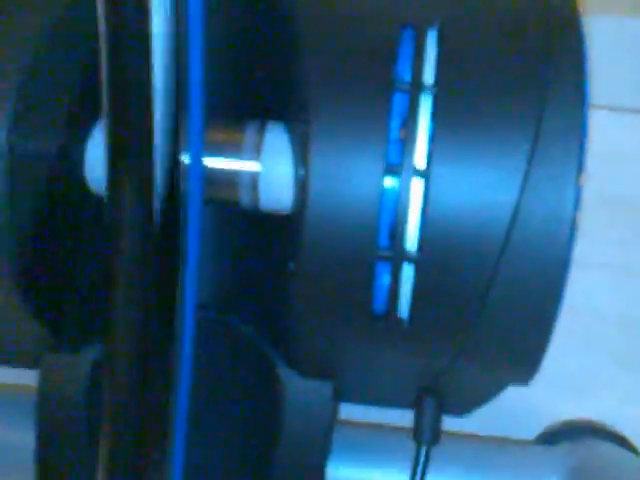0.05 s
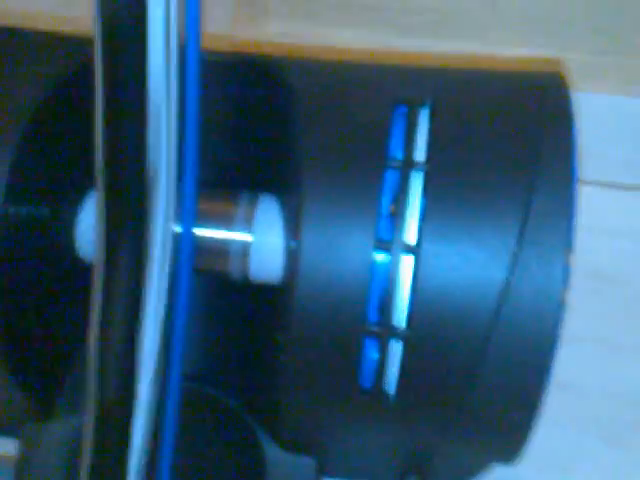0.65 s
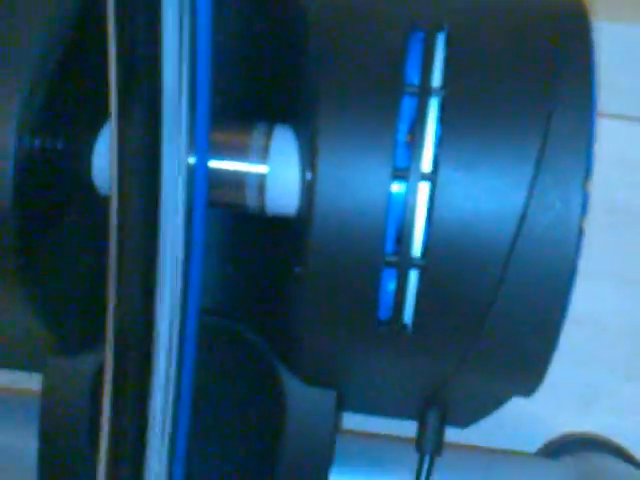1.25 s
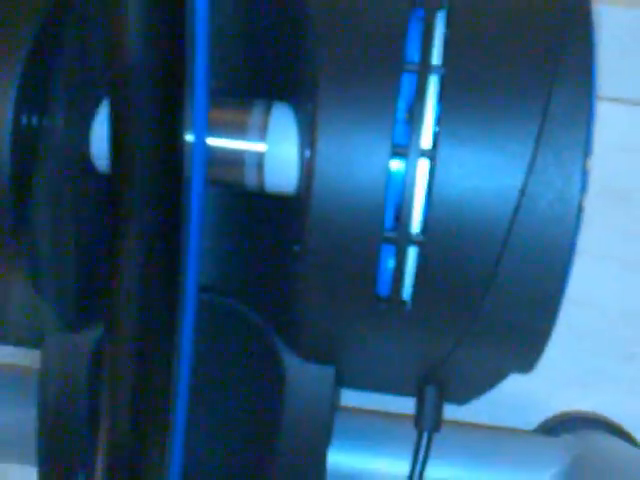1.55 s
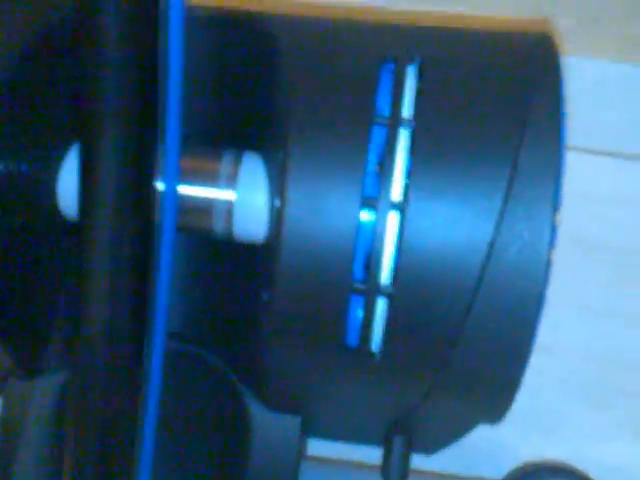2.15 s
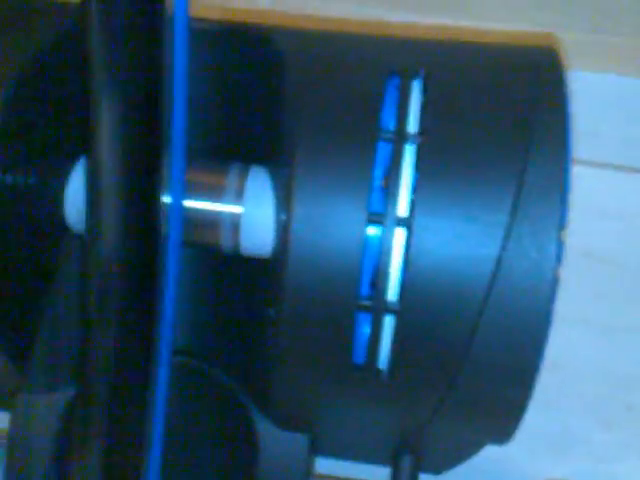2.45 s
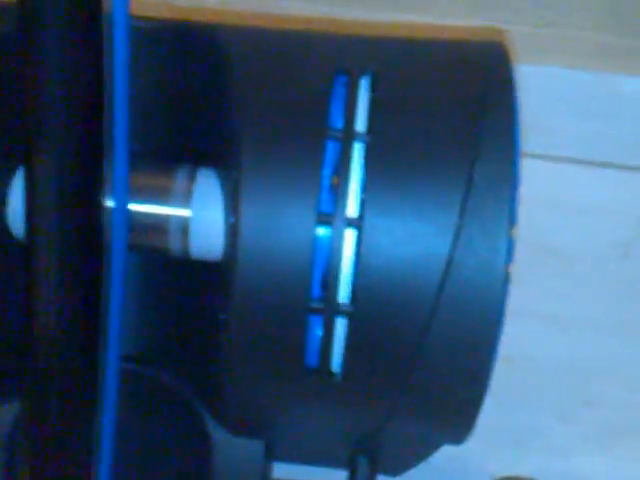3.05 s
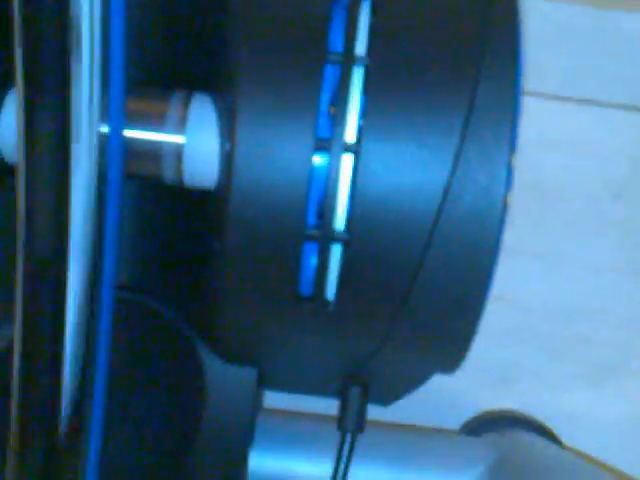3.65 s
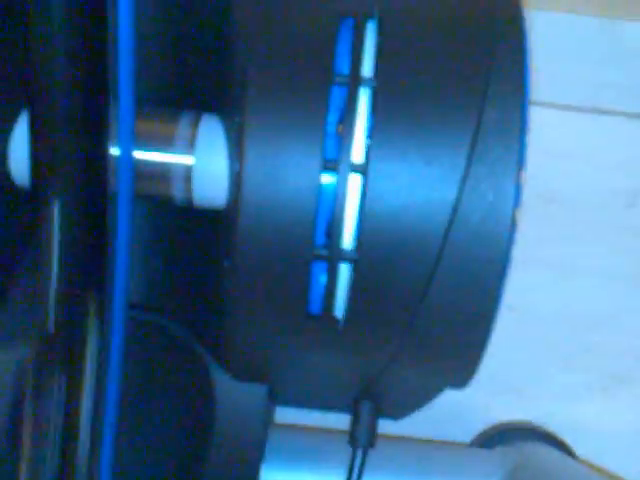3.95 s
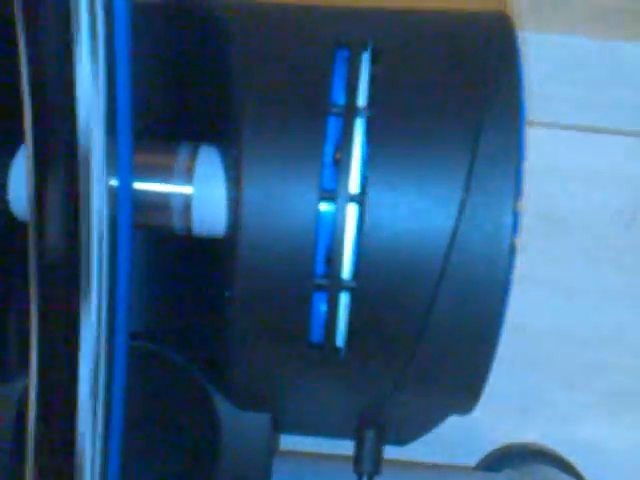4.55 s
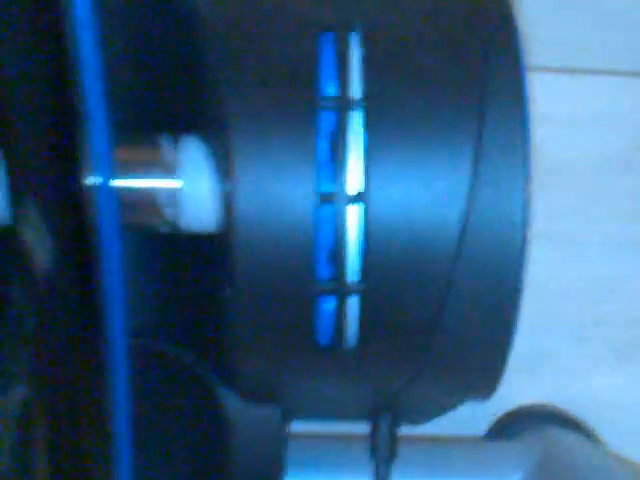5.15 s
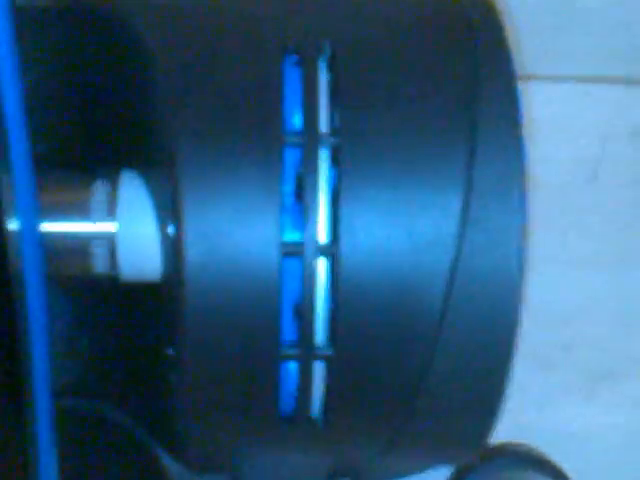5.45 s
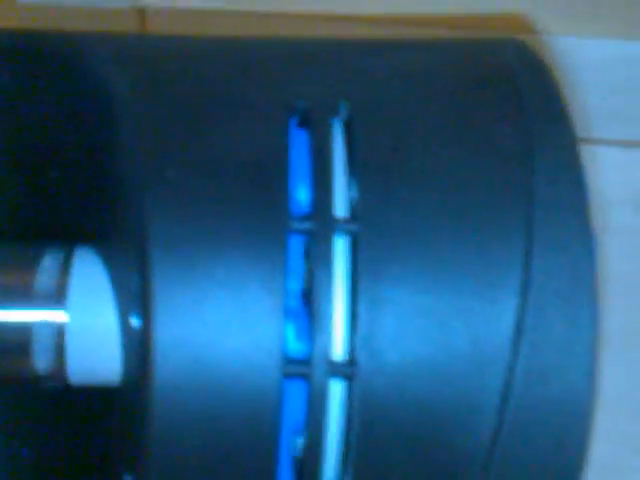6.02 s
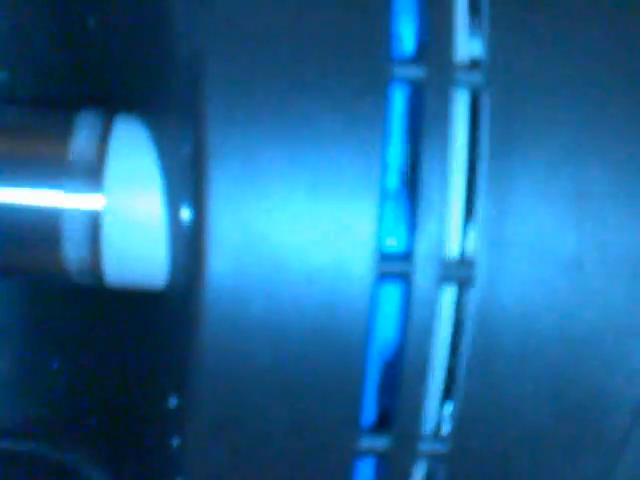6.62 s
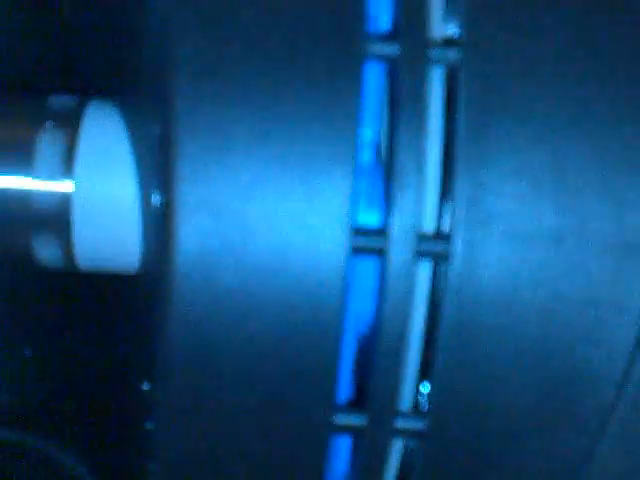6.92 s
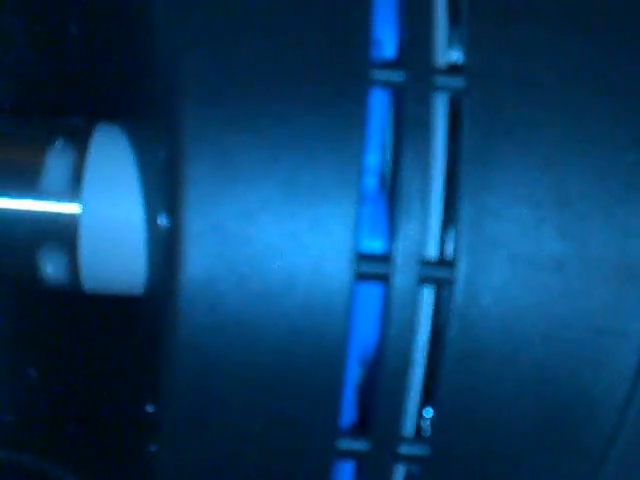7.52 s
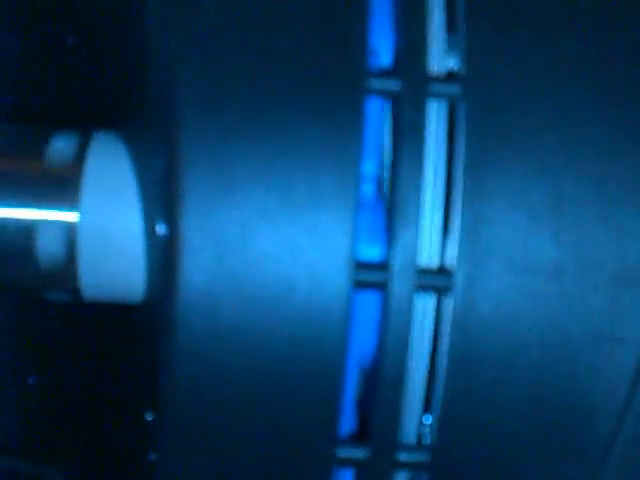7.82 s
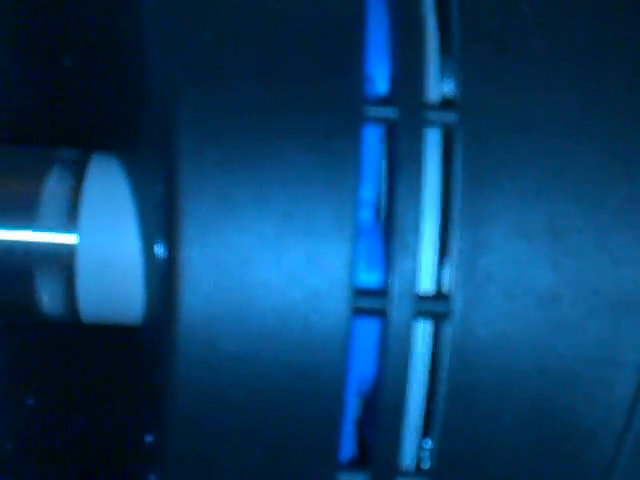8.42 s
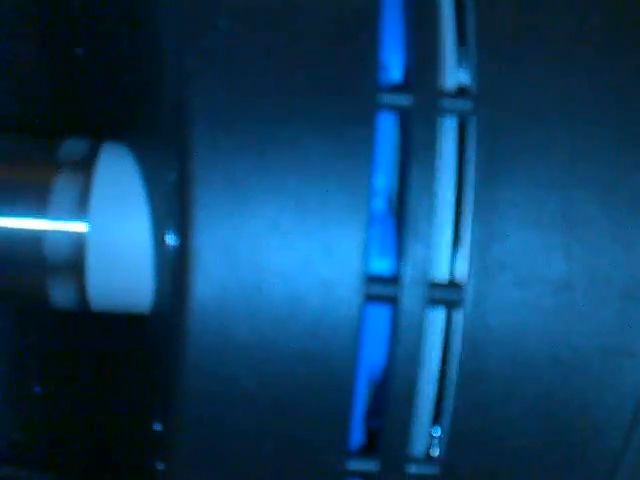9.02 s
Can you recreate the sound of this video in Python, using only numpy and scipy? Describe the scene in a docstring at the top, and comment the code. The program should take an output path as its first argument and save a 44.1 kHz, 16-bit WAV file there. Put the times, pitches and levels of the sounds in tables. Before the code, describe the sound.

A bicycle wheel spins on an indoor trainer, the tyre whirring on the roller in surges while the brake rubs once a turn, making rapid, ringing metallic ticks. A thump shakes the frame early on. About halfway the wheel slows and the whirr fades amid a brief hiss and a few handling knocks. Soft, slower scraping ticks and tiny squeaks carry on to the end, heard close up in a small room.

```python
"""A bicycle wheel spins on a turbo trainer in a small room, heard close to the brake unit.
At first the tyre whirrs on the roller, surging with the pedals. Once a turn a tight spot in the brake
rubs: it squeals, chatters near 1 kHz, scrapes and sets the metal ringing. Two bumps shake the frame.
By 5 s the wheel has slowed; the tyre fades amid a brush of hiss, handling knocks and four level dips.
To the end it creeps on, one soft chafe a turn. Short squeaks sound nearby throughout."""
import sys
import numpy as np
from scipy import signal
from scipy.fft import rfft, irfft
from scipy.io import wavfile
from scipy.ndimage import uniform_filter1d

SR = 44100
rng = np.random.default_rng(int(sys.argv[2]) if len(sys.argv) > 2 else 0)


def to_wav(s):
    """Save 16-bit WAV."""
    ch = np.atleast_2d(s).T  # columns
    pcm = np.round(np.clip(ch, -1, 1) * 32767)  # PCM
    wavfile.write(sys.argv[1], SR, pcm.astype(np.int16))


N = 409248
TIME_S = np.arange(N) / SR

# Wheel speed. Each row: time in seconds, turns per second.
SPEED_HZ = [(0.0, 18.12), (0.5, 17.81), (0.78, 15.43), (1.0, 11.82), (1.6, 17.5), (1.78, 16.73),
            (2.03, 17.3), (2.19, 18.45), (2.54, 14.01), (2.61, 11.67), (2.83, 11.93), (3.02, 13.52),
            (3.33, 14.33), (3.52, 13.13), (3.62, 11.93), (4.09, 11.94), (4.38, 10.87), (4.46, 9.3),
            (4.74, 8.13), (4.92, 5.15)]
# Grip of the tight spot; pedal effort. Each row: time in seconds, relative level in dB.
GRIP_DB = [(0.03, 2.5), (0.42, 1.5), (0.53, -0.8), (0.99, 0.4), (1.49, -1), (1.96, 1.7), (2.02, 3),
           (2.49, -2), (2.72, 4), (2.97, -3), (3.12, -1.0), (3.55, -3), (3.72, 2.6), (4.31, 2),
           (4.51, -2.5), (4.62, 6.5), (4.74, -2.5), (4.88, 7)]
PEDAL_DB = [(0.0, 13), (0.53, 8.0), (0.84, 2), (1.07, 15), (1.27, 19), (1.52, 14.5), (1.78, 11.5),
            (2.08, 11), (2.53, 0.5), (2.72, 15.5), (3.21, 12.5), (3.53, 6.5), (4.01, 13), (4.84, -2)]
# Start and end of the tyre's fade, in seconds.
TYRE_FADE_S = [4.7, 6.5]
# Room decay. Each row: frequency in Hz, t60 in seconds.
ROOM_T60_S = [(150, 0.3), (1000, 0.12), (4000, 0.17), (14000, 0.19)]
# Room hum. Each row: frequency in Hz, level in dB.
HUM_TONES = [(48.5, -83), (846.6, -91)]
# Handling rumble. Each row: centre in seconds, level in dB, half-width in seconds.
HANDLING_SWELLS = [(5.313, -54, 0.09), (5.76, -62, 0.092), (6.34, -61.5, .11), (6.8, -78, 0.1)]
# Frame bumps. Each row: start in seconds, level in dB, pitch in Hz, t60 in seconds, relative rattle in dB.
FRAME_BUMPS = [(0.269, -34, 211, 0.083, 8.5), (1.528, -16.5, 118, 0.026, -3.5), (5.07, -34.5, 91, 0.1, -14),
               (5.652, -43.5, 60, 0.087, -4.5)]
# One short brush of high hiss, then handling knocks. Each row: start in seconds, level in dB,
# t60 in seconds, low and top edges in Hz, relative crack and frame shake in dB.
BRUSH_AND_KNOCKS = [(5.068, -54, 0.35, 5450, 15000, -17, -25), (5.229, -48.5, 0.69, 480, 8400, 1, -11),
                    (5.326, -40, 0.53, 524, 1740, -16, -30), (5.652, -57.5, 0.6, 404, 1290, 7.5, -8),
                    (6.409, -53.5, 0.45, 470, 1300, -35, -7), (6.583, -40, 0.56, 610, 1000, -27, -12)]
# Squeaks. Each row: centre in seconds, pitch in Hz, level in dB, half-width in seconds.
SQUEAK_TONES = [(0.919, 1974, -31.5, 0.01), (4.249, 2304, -45.5, 0.015), (5.272, 8100, -39, 0.0037),
                (5.273, 5900, -45, 0.0055), (5.44, 1970, -40.5, 0.011), (6.031, 4420, -58.5, 0.012),
                (6.959, 2080, -59, 0.0095), (7.345, 1827, -64, 0.015), (8.052, 4510, -54, 0.01),
                (8.221, 2050, -62, 0.007), (8.624, 2040, -64, .007), (8.682, 3620, -70, .02)]
# Creeping rubs. Each row: time in seconds, chatter and scrape base levels in dB, high ring lift in dB.
CREEP_CHAFES = [(5.028, -41.5, -45, -7), (5.385, -38, -41.5, -5), (5.603, -53, -58.5, -11),
                (5.875, -50, -52.5, -1), (6.1269, -52, -53, -2), (6.365, -52, -52.5, 3),
                (6.617, -48, -44, -1), (6.9007, -49.5, -47, -3), (7.1786, -53.5, -48.5, -1),
                (7.4554, -57.5, -50.5, 0.5), (7.7888, -48, -51.5, 1.5), (8.196, -46, -48.5, 1),
                (8.531, -51, -49.5, 0.5), (8.795, -52, -49, 0), (9.0712, -52, -47, -1)]
# Level dips. Each row: start and end in seconds.
DIPS_S = [(5.163, 5.228), (5.305, 5.322), (5.621, 5.652), (6.463, 6.582)]

# Noise spectra. Each row: frequency in Hz, relative density in dB.
AIR_SPECTRUM = [(25, -1.5), (150, -9.5), (350, -16.5), (900, -9.5), (2000, -16.5), (4500, -15), (8000, -21),
                (16000, -16.5)]
FRAME_SPECTRUM = [(15, -17.5), (30, -12.5), (48, 7), (90, -5), (135, -4), (200, -7.5), (330, -15.5),
                  (700, -31.5), (3000, -60.5)]
WHIRR_SPECTRUM = [(150, -16), (350, -19), (480, -8), (700, -7.5), (1000, 7), (1400, -2), (2200, -1),
                  (2800, -5.5), (4300, -21), (6000, -32), (16000, -55)]
RASP_SPECTRUM = [(1200, -28), (2300, -2.5), (2900, -1), (3500, -3), (4000, -5.5), (4700, -16.5),
                 (7000, -31), (16000, -48)]
HISS_SPECTRUM = [(2000, -24), (4500, -6.5), (6500, -0.5), (9000, -3), (11500, -4), (13000, -6),
                 (16000, -12.5)]
FAST_SCRAPE_SPECTRUM = [(200, -21), (420, -10.5), (600, 2), (800, -3.5), (1500, 5.5), (2200, 1),
                        (3200, 4.5), (4000, -7.5), (4700, -11.5), (6500, -8.5), (7150, -15.5), (8300, -15),
                        (12000, -25), (16000, -30.5)]
SLOW_SCRAPE_SPECTRUM = [(200, -30.5), (550, -18), (1000, 3.5), (1500, -8), (1900, -14.5), (2350, -32.5),
                        (3000, -0.5), (4000, -2), (4700, -11), (6600, -13), (7150, -16), (8500, -19),
                        (12000, -21.5), (16000, -35.5)]
# Resonances. Each row: centre in Hz, width in Hz, lift in dB.
CRACK_PEAKS = [(2900, 76, -29), (3470, 150, -17), (3880, 180, 3), (5870, 310, 8)]
HOUSING_PEAKS = [(450, 30, 4), (572, 31, -8), (1379, 50, 0.5), (1572, 24, -4.5), (1852, 130, -9.5),
                 (2230, 17, 1.5), (2820, 57, -8), (3025, 21, -5.5), (3350, 42, -4.5), (3785, 82, -2.5),
                 (5330, 120, 3.5), (5620, 58, -0.5), (6120, 57, 2), (6735, 220, 0), (8460, 380, 1.5),
                 (9090, 340, 1.5)]
ROLLER_PEAKS = [(2100, 76, -1.5), (2690, 190, -8), (3370, 100, -0.5), (3740, 99, -5), (6180, 140, 1),
                (6550, 110, -0.5)]
RUB_PEAKS = [(3986, 160, 5), (7886, 100, 11), (7770, 300, 5), (10846, 430, 19.5), (14180, 170, 21.5)]
SLOW_RUB_PEAKS = [(2985, 46, 0), (3300, 200, -10.5), (4176, 150, 2), (5374, 90, -2), (6880, 90, 3),
                  (7620, 110, 8), (9150, 170, 6)]  # only a slow chafe has time to build these up
# Brake modes. Each row: frequency in Hz, gain in dB when fast and when slow, t60 in seconds.
LOW_BRAKE_MODES = [(901.8, 3.5, 9.5, 0.17), (560.5, -0.5, -30.5, 0.045), (755, -24, -12, 0.43),
                   (944, 5.5, -15.5, 0.058), (1225, -14, -3, 0.14), (1559, -10.5, -7.5, 0.13),
                   (2101, 7, 1, 0.039), (3100, -9, -3.5, 0.027)]
HIGH_BRAKE_MODES = [(3300, -18.5, -7, 0.037), (4170, -14, -13.5, .04), (4270, -30, 1, 0.055),
                    (4920, -20.5, -25, 0.21), (4980, -38, -14.5, 0.14), (7600, -16, -11.5, 0.14),
                    (14180, -19.5, -21, .06)]
# Stick-slip harmonics. Each row: multiple, gain in dB when fast and when slow.
CHATTER_HARMONICS = [(1, -2, 5.5), (2, -9, -48.5), (3, -20, -20.5), (4, -24.5, -29.5)]


def from_db(db):
    return 10 ** (np.asarray(db) / 20)


def unit_rms(x):
    return x / np.sqrt(np.mean(x ** 2) + 1e-20)


def bell(t, width):
    return np.exp(-0.5 * (t / width) ** 2)


def at_time(curve, time_s=TIME_S):
    return np.interp(time_s, *np.transpose(curve))


def at_hz(curve, hz):
    knots_hz, values = np.transpose(curve)
    return np.interp(np.log(hz + 1e-3), np.log(knots_hz), values)


def colour(white, spectrum, peaks=()):
    """Shape noise by a spectrum and resonances; rms 1."""
    hz = np.arange(len(white) // 2 + 1) * SR / len(white)
    lift = 1 + sum(from_db(db) / (1 + (2 * (hz - f) / width_hz) ** 2) for f, width_hz, db in peaks)
    return unit_rms(irfft(rfft(white) * from_db(at_hz(spectrum, hz)) * lift, len(white)))


def filtered(x, hz, kind, order=2):
    return signal.sosfilt(signal.butter(order, hz, kind, fs=SR, output="sos"), x)


def noise(size):
    return rng.standard_normal(size)


def flutter(size, rate_hz):
    """Random wavering up to rate_hz; rms 1."""
    return unit_rms(filtered(noise(size), rate_hz, "low"))


def add(track, start_s, sound):
    start = round(start_s * SR)
    a, b = max(start, 0), min(start + len(sound), N)
    track[a:b] += sound[a - start:b - start]


def halvings(time_s=TIME_S, full_speed_hz=18):
    """Octaves of wheel speed lost from full speed."""
    return np.log2(full_speed_hz / at_time(SPEED_HZ, time_s))


def rub_times_s(first_s=0.0303):
    """One rub a turn while spinning, then the single chafes."""
    t = TIME_S[TIME_S < SPEED_HZ[-1][0]]
    angle_turns = np.cumsum(at_time(SPEED_HZ, t)) / SR
    rub_turns = np.arange(np.interp(first_s, t, angle_turns), angle_turns[-1])
    return np.r_[np.interp(rub_turns, angle_turns, t), np.array(CREEP_CHAFES)[:, 0]]


def turns():
    """Per rub: turn length in seconds, capped, and slowness from 0 (spinning) to 1 (creeping)."""
    turn_s = np.minimum(np.gradient(rub_times_s()), 0.27)
    return turn_s, np.clip((turn_s - 0.06) / 0.21, 0, 1)


def rub_levels_db():
    """Base levels per rub: faster and tighter is louder; slowness favours scrape over ring."""
    _, slow = turns()
    spin_s = rub_times_s()[:-len(CREEP_CHAFES)]
    _, chafe_chatter_db, chafe_scrape_db, lift_db = np.transpose(CREEP_CHAFES)
    grip_db, slowed = at_time(GRIP_DB, spin_s), halvings(spin_s)
    chatter_db = -15 - 15.5 * slowed + 0.92 * grip_db
    scrape_db = -27 - 18 * slowed + 0.51 * grip_db + 8 * slow[:len(spin_s)]
    low_ring_db = np.r_[chatter_db + 0.58 * grip_db, chafe_chatter_db] - 7 - 17 * slow
    high_ring_db = np.r_[scrape_db, chafe_scrape_db + lift_db] + 4
    return np.r_[chatter_db, chafe_chatter_db], np.r_[scrape_db, chafe_scrape_db], low_ring_db, high_ring_db


def room_tone(air_db=-75.5):
    """Still air and a faint hum."""
    hum = sum(np.sqrt(2) * from_db(db) * np.sin(2 * np.pi * hz * TIME_S) for hz, db in HUM_TONES)
    return from_db(air_db) * colour(noise(N), AIR_SPECTRUM) + hum


def room_reverb(x, delay_s=0.0056):
    """Diffuse tail in octave bands, longest in the bass; unit energy."""
    t = np.arange(SR // 2) / SR
    tail = np.zeros(len(t))
    for low_hz in 60 * 2.0 ** np.arange(8):
        t60_s = at_hz(ROOM_T60_S, low_hz * np.sqrt(2))
        tail += filtered(noise(len(t)), [low_hz, 2 * low_hz], "band") * from_db(-60 * t / t60_s)
    tail *= np.clip(t / delay_s - 1, 0, 1)
    return signal.fftconvolve(x, tail / np.sqrt(np.sum(tail ** 2)))[:N]


def frame_rumble(rest_db=-82.5, lumps_db=2):
    """The frame shakes with speed and brake grip; handling adds low swells."""
    shake = from_db(-48.5 - 18.5 * halvings() + 1.1 * at_time(GRIP_DB))
    shake *= np.interp(TIME_S, TYRE_FADE_S, [1, 0])
    handling = sum(from_db(db) * bell(TIME_S - at_s, width_s) for at_s, db, width_s in HANDLING_SWELLS)
    envelope = (shake + handling + from_db(rest_db)) * from_db(lumps_db * flutter(N, 15))
    return envelope * colour(noise(N), FRAME_SPECTRUM)


def bumps(attack_s=0.0016, rattle_hz=(90, 1400)):
    """A bump rocks the frame for a few cycles and rattles its fittings."""
    out, t = np.zeros(N), np.arange(SR // 5) / SR
    for start_s, db, hz, t60_s, rattle_db in FRAME_BUMPS:
        rattle = from_db(rattle_db) * unit_rms(filtered(noise(len(t)), rattle_hz, "band", order=1))
        rocking = np.sqrt(2) * np.sin(2 * np.pi * hz * t)
        envelope = from_db(db - 60 * t / t60_s) * (1 - np.exp(-t / attack_s))
        add(out, start_s, envelope * (rocking + rattle))
    return out


def brush_and_knocks(attack_s=0.0069, lumps_db=1, crack_hz=6000, shake_t60_s=0.8):
    """Handling, a hissy brush then damped knocks: a noise band and crack fade as the frame shakes."""
    out, t = np.zeros(N), np.arange(SR // 2) / SR
    for start_s, db, t60_s, low_hz, top_hz, crack_db, shake_db in BRUSH_AND_KNOCKS:
        band = unit_rms(filtered(noise(len(t)), [low_hz, top_hz], "band"))
        crack = colour(noise(len(t)), [(300, -1), (16000, -9)], CRACK_PEAKS)
        crack = from_db(crack_db) * unit_rms(filtered(crack, crack_hz, "low"))
        shake = unit_rms(filtered(noise(len(t)), [30, 260], "band"))
        shake *= from_db(shake_db - 60 * t / shake_t60_s)
        contact = from_db(lumps_db * flutter(len(t), 54) - 60 * t / t60_s) * (band + crack)
        add(out, start_s, from_db(db) * (1 - np.exp(-t / attack_s)) * (contact + shake))
    return out


def squeaks(waver=0.0476):
    """Short, unsteady friction tones."""
    out, t = np.zeros(N), np.arange(-SR // 10, SR // 10) / SR
    for centre_s, hz, db, width_s in SQUEAK_TONES:
        pitch_hz = hz * (1 + waver * flutter(len(t), 460))
        tone = np.sqrt(2) * np.sin(2 * np.pi * np.cumsum(pitch_hz) / SR)
        add(out, centre_s + t[0], from_db(db) * bell(t, width_s) * tone)
    return out


def tyre(grain_db=1.5):
    """Tread whirrs on the roller, louder with speed; pedal strokes bring out rasp and hiss."""
    pedal_db, slowed = at_time(PEDAL_DB), halvings()
    tread = np.interp(TIME_S, TYRE_FADE_S, [1, 0]) * from_db(grain_db * flutter(N, 77))
    layers = [(-37 - 17 * slowed + 0.24 * pedal_db, WHIRR_SPECTRUM),
              (-49 - 16.5 * slowed + 1.03 * pedal_db, RASP_SPECTRUM),
              (-52 - 29.5 * slowed + 0.97 * pedal_db, HISS_SPECTRUM)]
    peaks = HOUSING_PEAKS + ROLLER_PEAKS
    return tread * sum(from_db(db) * colour(noise(N), spectrum, peaks) for db, spectrum in layers)


def squeal(levels_db, hz=10950, sag=0.025, waver=0.02, lead_turns=0.055, width_turns=0.055):
    """A thin falling squeal as the spot first touches, before it bites."""
    out, t = np.zeros(N), np.arange(-SR // 20, SR // 20) / SR
    for rub_s, db, turn_s, slow in zip(rub_times_s(), levels_db, *turns()):
        width_s = width_turns * turn_s
        pitch_hz = hz * (1 - sag * np.tanh(t / width_s) + waver * flutter(len(t), 900))
        tone = bell(t, width_s) * np.sin(2 * np.pi * np.cumsum(pitch_hz) / SR)
        add(out, rub_s - lead_turns * turn_s + t[0], from_db(db - 7 - 6 * slow) * tone)
    return out


def ringing(modes, levels_db, build_s, delay_turns, waver_db, spread_db=2, damp_s=0.01):
    """Each rub rings the metal, damped a turn later; speed sets the mix of modes."""
    out, t = np.zeros(N), np.arange(SR // 5) / SR
    hz, fast_db, slow_db, t60_s = np.transpose(modes)[:, :, None]
    for rub_s, db, turn_s, slow in zip(rub_times_s(), levels_db, *turns()):
        mode_db = fast_db + np.sqrt(slow) * (slow_db - fast_db) + spread_db * noise(hz.shape)
        # loose contact wavers level and phase
        contact_db = waver_db * flutter(len(t), 64)
        phase = 2 * np.pi * (hz * t + 0.44 * noise(hz.shape)) + 0.25 * waver_db * flutter(len(t), 64)
        ring = np.sum(from_db(mode_db + contact_db - 60 * t / t60_s) * np.sin(phase), axis=0)
        envelope = (1 - np.exp(-t / build_s)) * np.exp(-np.maximum(t - turn_s, 0) / damp_s)
        add(out, rub_s + delay_turns * turn_s, from_db(db) * envelope * ring)
    return out


def scrape(levels_db, grain_db=0.5, catch_db=4, snaps_per_s=1100, snap_db=16, recatch_turns=0.069):
    """One rough patch passes each turn, with fresh grit; when slow it snaps and catches twice."""
    out, t = np.zeros(N), np.arange(-SR // 10, SR // 10) / SR
    patch, peaks = noise(len(t)), HOUSING_PEAKS + RUB_PEAKS
    for rub_s, db, turn_s, slow in zip(rub_times_s(), levels_db, *turns()):
        snaps = (rng.random(len(t)) < snaps_per_s / SR) * noise(len(t))
        grit = patch + noise(len(t)) + slow * from_db(snap_db) * snaps
        grit *= from_db(grain_db * flutter(len(t), 500) + slow * catch_db * flutter(len(t), 110))
        fast_rub = from_db(3) * colour(grit, FAST_SCRAPE_SPECTRUM, peaks)
        slow_rub = from_db(-1.5) * colour(grit, SLOW_SCRAPE_SPECTRUM, peaks + SLOW_RUB_PEAKS)
        friction = np.sqrt(1 - slow) * fast_rub + np.sqrt(slow) * slow_rub
        angle_turns = t / turn_s + 0.017 * (1 - slow)
        bite = bell(angle_turns, np.where(angle_turns < 0, 0.065, 0.058) * (1 - 0.37 * slow))
        drag = from_db(-15) * bell(angle_turns - 0.17 * (1 - slow), 0.14 * (1 - 0.25 * slow))
        recatch = slow * from_db(-8) * bell(angle_turns - recatch_turns, 0.017)
        add(out, rub_s + t[0], from_db(db) * (bite + drag + recatch) * friction)
    return out


def chatter(levels_db, hz=1028, sag=0.017, waver=0.026, recatch_turns=0.069):
    """The tight spot sticks and slips, its pitch sagging as it lets go; when slow it catches twice."""
    out, t = np.zeros(N), np.arange(-SR // 12, SR // 12) / SR
    for rub_s, db, turn_s, slow in zip(rub_times_s(), levels_db, *turns()):
        contact_s = 0.042 * turn_s * (1 - 0.59 * slow)
        grip = bell(t, contact_s) + slow * from_db(-7) * bell(t - recatch_turns * turn_s, contact_s)
        pitch_hz = hz * (1 - sag * (1 - slow) * np.tanh(t / contact_s) + waver * flutter(len(t), 110))
        phase = 2 * np.pi * np.cumsum(pitch_hz) / SR
        phase -= phase[len(t) // 2]
        # harmonics peak together at each slip
        slips = sum(from_db(fast_db + slow * (slow_db - fast_db)) * np.cos(multiple * phase)
                    for multiple, fast_db, slow_db in CHATTER_HARMONICS)
        add(out, rub_s + t[0], from_db(db + 2) * grip * slips)
    return out


def scene(brake_send_db=-19, squeak_send_db=-5):
    """Mono mix: the brake close and fairly dry, the squeaks farther off."""
    chatter_db, scrape_db, low_db, high_db = rub_levels_db()
    metal = ringing(LOW_BRAKE_MODES, low_db, build_s=0.0041, delay_turns=-0.02, waver_db=0.75)
    metal += ringing(HIGH_BRAKE_MODES, high_db, build_s=0.0014, delay_turns=0.015, waver_db=4.5)
    brake = squeal(scrape_db) + chatter(chatter_db) + scrape(scrape_db) + metal
    squeak = squeaks()
    reverb = room_reverb(from_db(brake_send_db) * brake + from_db(squeak_send_db) * squeak)
    nearby = squeak + bumps() + brush_and_knocks()
    return (brake + nearby + reverb + tyre() + frame_rumble() + room_tone())[None]


def record(dry, dip_db=-36, cutoff_hz=15850):
    """Four brief level dips, then a steep low-pass."""
    dipped = sum(((TIME_S > start_s) & (TIME_S < end_s)) * 1.0 for start_s, end_s in DIPS_S)
    gain = from_db(dip_db * uniform_filter1d(dipped, size=130))
    return signal.sosfilt(signal.ellip(10, 0.1, 80, cutoff_hz, fs=SR, output="sos"), dry * gain)


dry = scene()
out = record(dry)
to_wav(out)
```